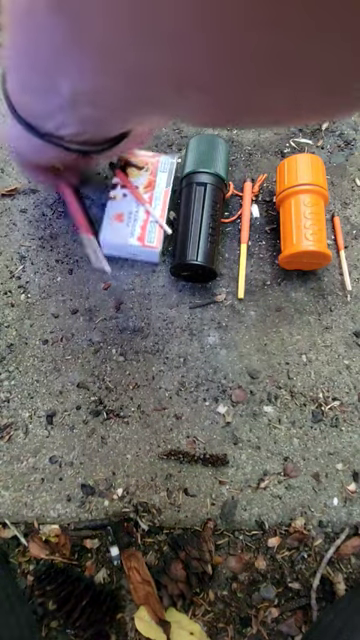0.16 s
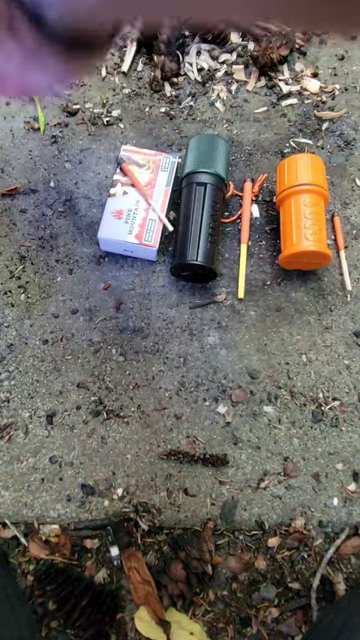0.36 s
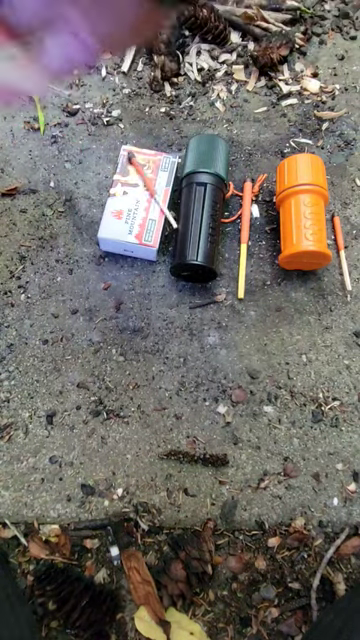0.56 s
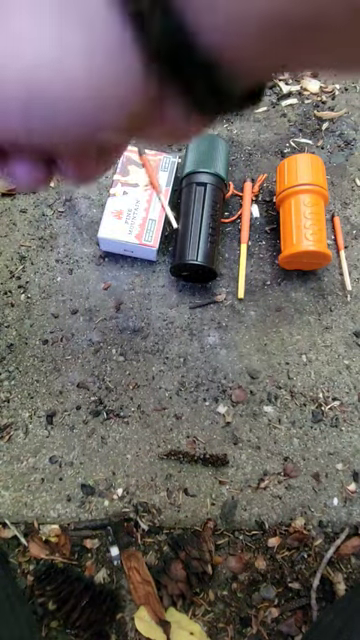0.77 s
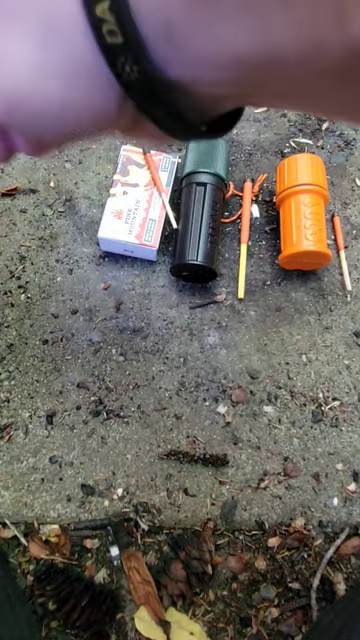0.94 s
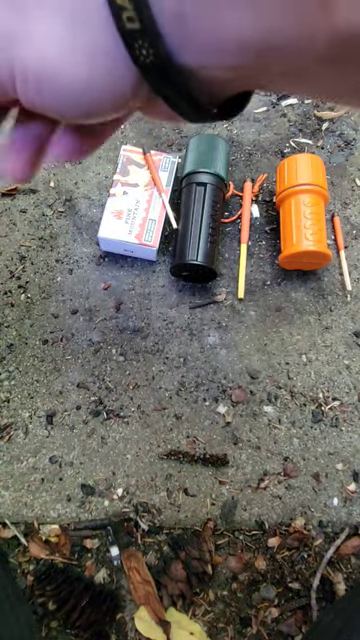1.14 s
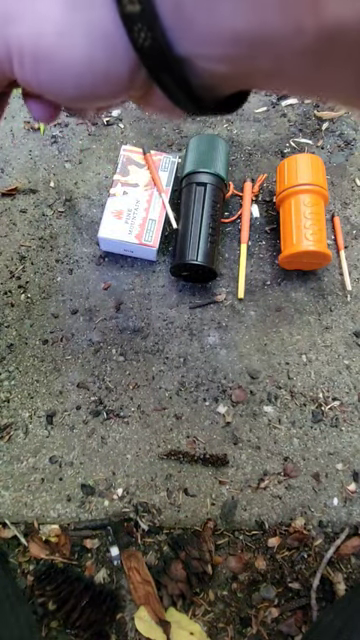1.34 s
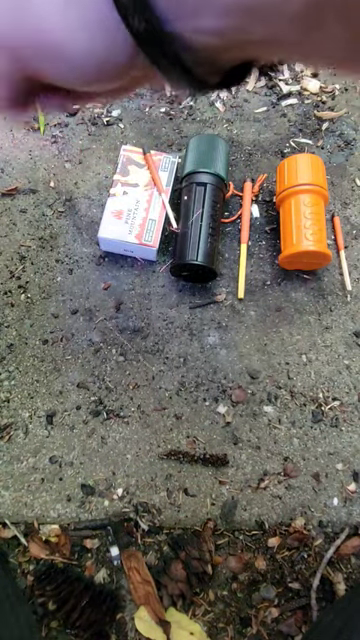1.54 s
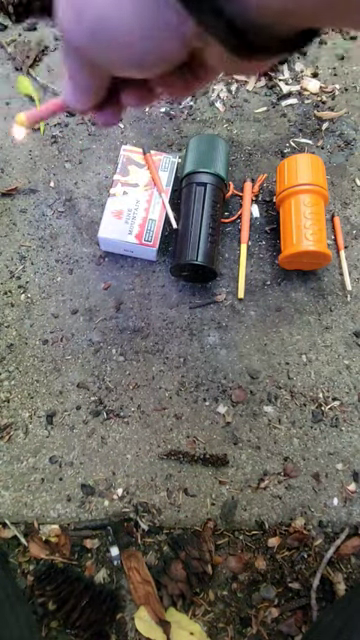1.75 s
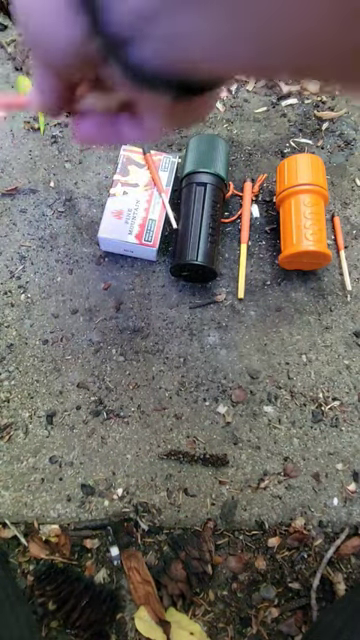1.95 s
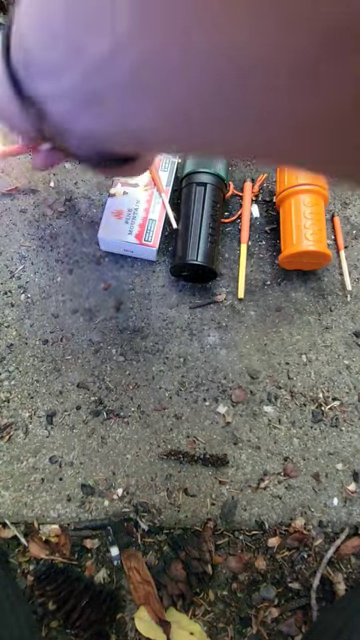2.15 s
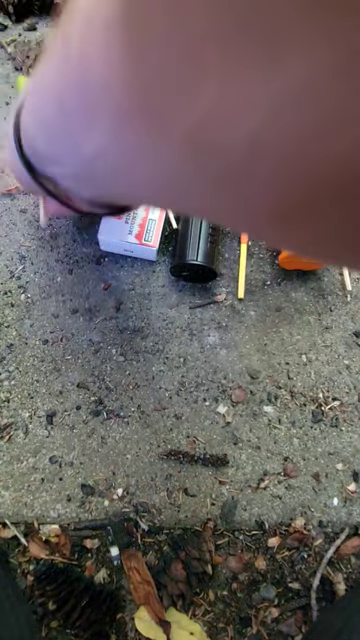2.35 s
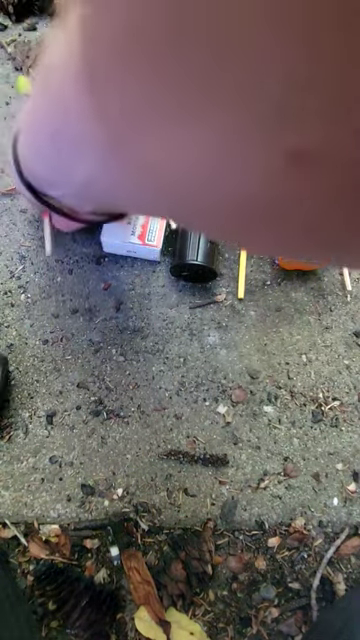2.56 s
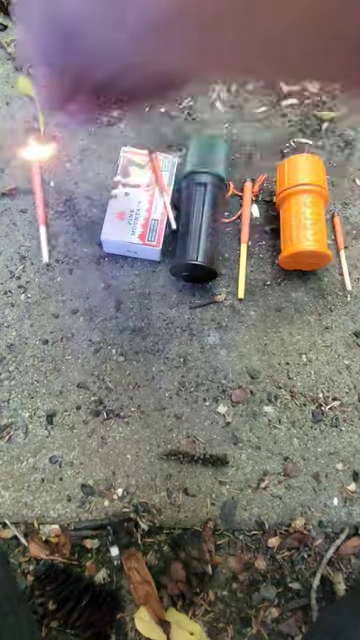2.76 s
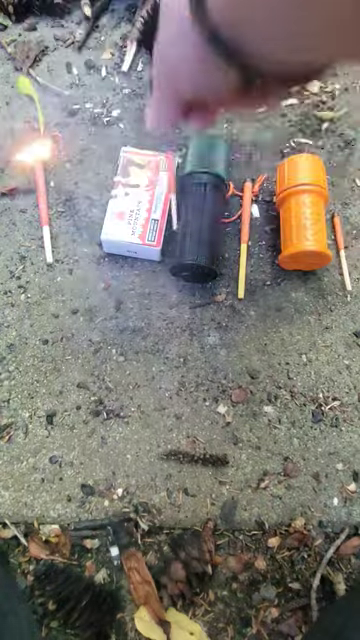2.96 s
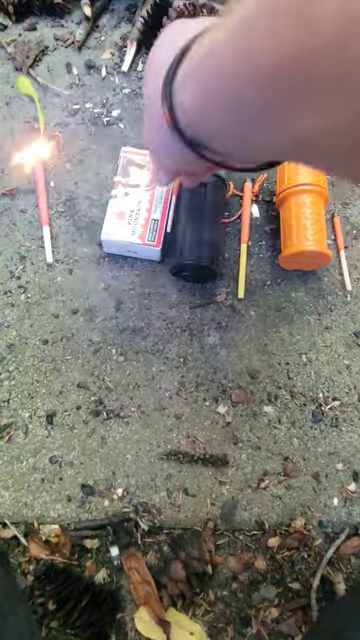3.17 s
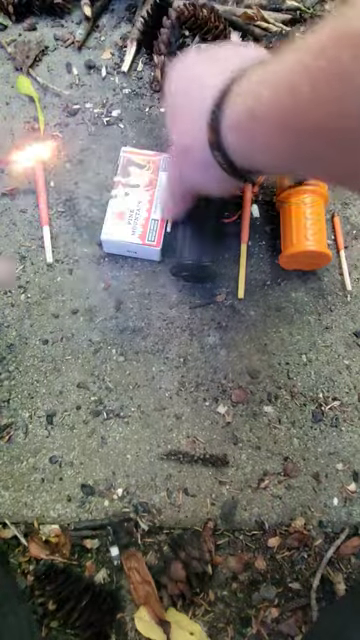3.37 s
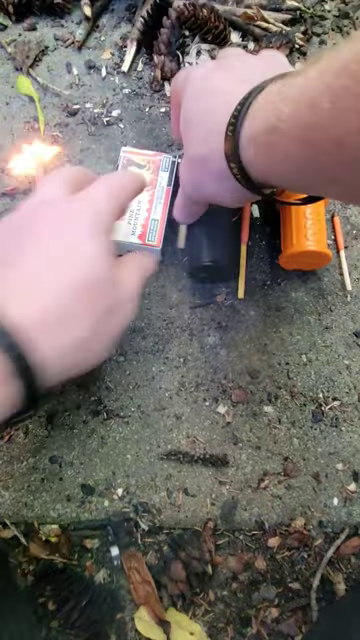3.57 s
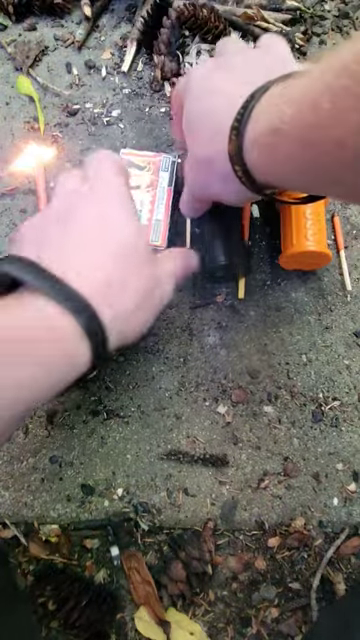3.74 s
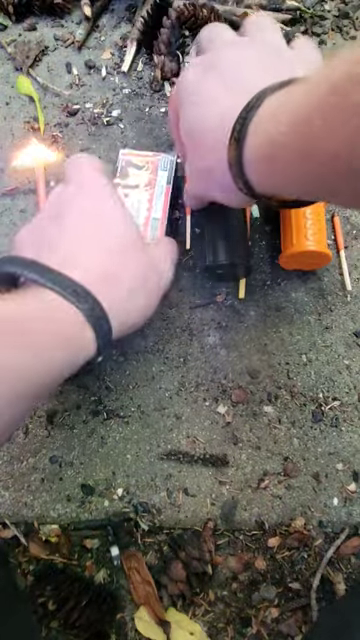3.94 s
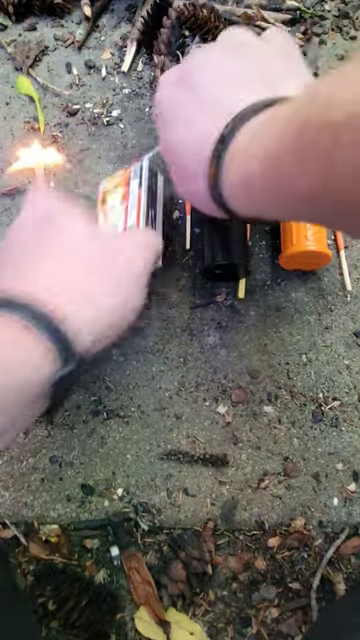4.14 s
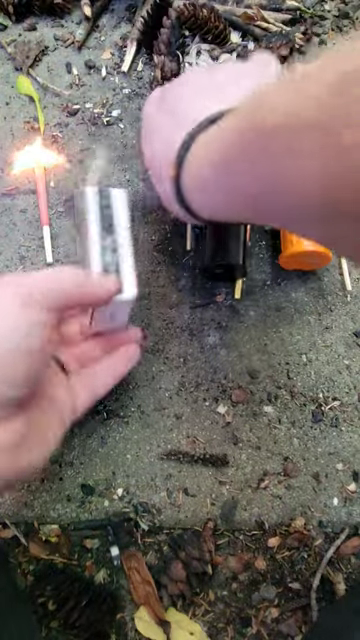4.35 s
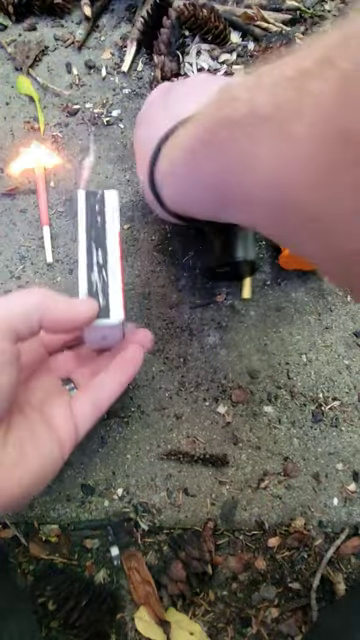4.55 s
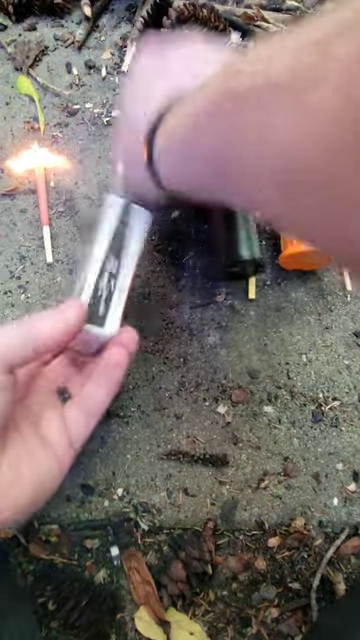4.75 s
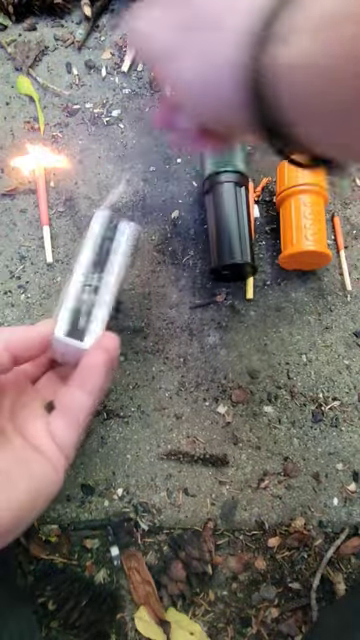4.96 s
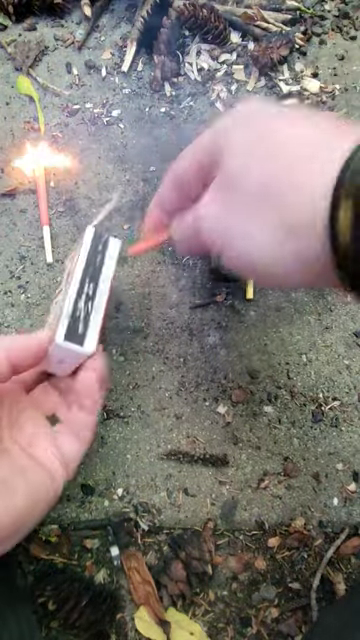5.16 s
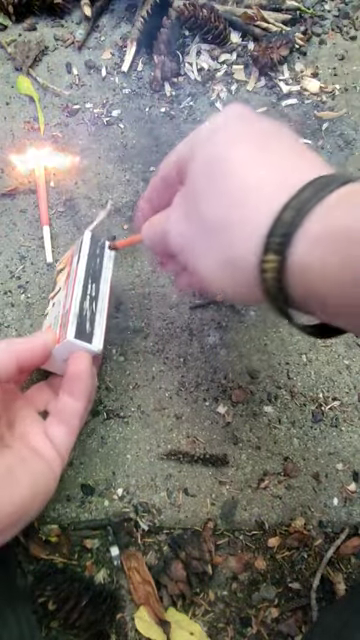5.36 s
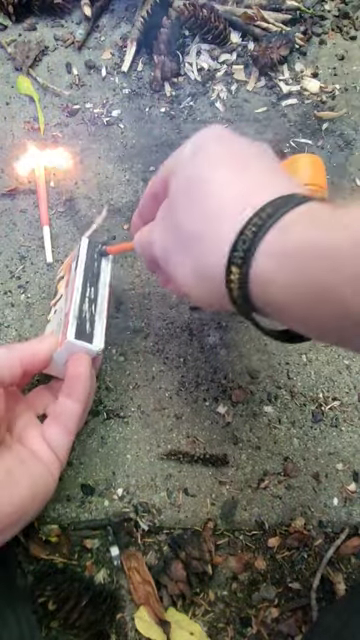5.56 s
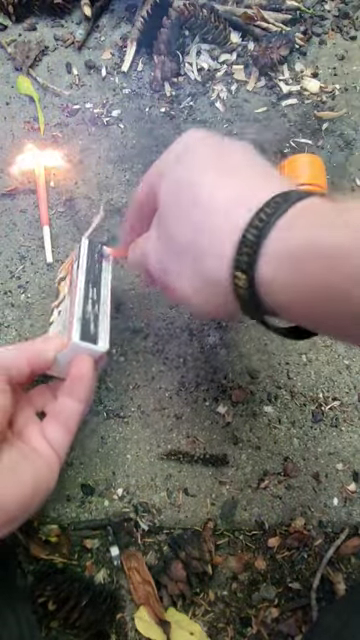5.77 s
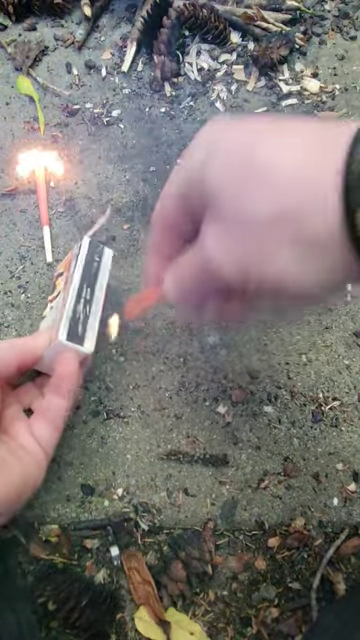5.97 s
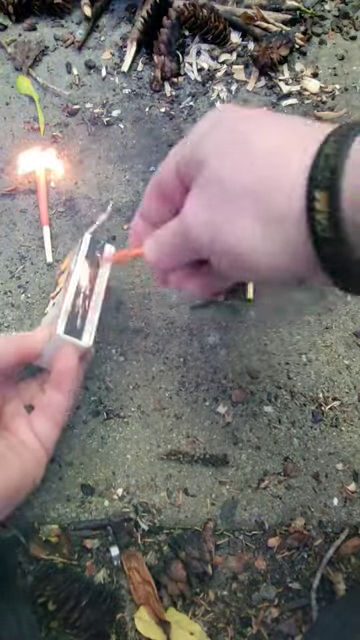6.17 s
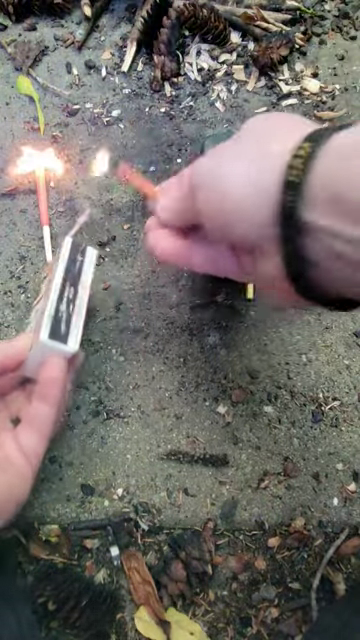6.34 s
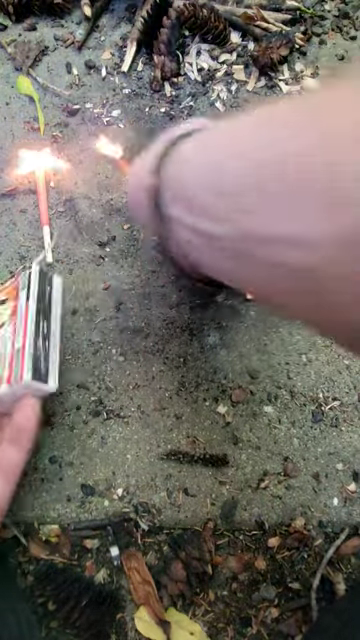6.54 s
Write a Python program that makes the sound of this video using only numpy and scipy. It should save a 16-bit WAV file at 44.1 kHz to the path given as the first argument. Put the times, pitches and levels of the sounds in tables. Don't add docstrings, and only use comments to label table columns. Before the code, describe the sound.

A quiet outdoor place with soft, low distant traffic rumble and a faint airy wash that rises slightly toward the end. From 0 to 1.3 s, small card knocks, stick ticks and short dull rubs are heard close up, with a light sleeve rustle strongest around 0.6 s. At about 1.63 s a match is struck: several gritty bites within a few hundredths of a second, loud and raspy, with a low hand thump. A thin spitting fizz follows, swelling near 1.8 s, then wavering softly as the match is lowered. Crisp stick clicks come at 2.57 s and cluster around 3.1 s, with bright skin rubs near 2.9 s. Card knocks at 4.2 s, three tiny plastic ticks around 4.6 s, and light box taps at 5.3 to 5.6 s. At 5.87 to 5.9 s a second match gives two hard, sharp scrapes. Faint fizz and ambience remain until 6.6 s.

```python
import sys
import numpy as np
from scipy import signal
from scipy.io import wavfile
from scipy.ndimage import uniform_filter1d, map_coordinates

SR = 44100
rng = np.random.default_rng(int(sys.argv[2]) if len(sys.argv) > 2 else 0)


def log_audio(samples):
    frames = np.atleast_2d(samples).T
    limited = np.clip(frames, -1, 1)
    pcm = np.round(limited * 32767).astype(np.int16)
    wavfile.write(sys.argv[1], SR, pcm)


def convert_level_to_amplitude(level_db):
    exponent = np.asarray(level_db, float) / 20
    return 10 ** exponent


N = 291360
PORT_LEAD_S = 0.000283


def evened(x):
    return x / np.sqrt(np.mean(x ** 2) + 1e-20)


def read(points, hz):
    point_hz, value = np.transpose(points)
    return np.interp(np.log(hz + 1), np.log(point_hz + 1), value)


def colour(x, points):
    gain_db = np.maximum(read(points, abs(np.fft.fftfreq(4096, 1 / SR))), -100)
    log_gain = np.log(convert_level_to_amplitude(gain_db))
    taps = np.fft.ifft(np.exp(np.conj(signal.hilbert(log_gain)))).real[:1024]
    taps = taps.reshape((1,) * (x.ndim - 1) + (-1,))
    return signal.oaconvolve(x, taps, axes=-1)[..., :x.shape[-1]]


def ring(x, modes):
    out = 0
    for hz, width_hz, db in modes:
        pole = np.exp((-np.pi * abs(width_hz) + 2j * np.pi * hz) / SR)
        out = out + convert_level_to_amplitude(db) * 2 * signal.lfilter([1 - abs(pole)], [1, -pole], x).real
    return out


def delayed(x, seconds):
    return map_coordinates(x, [np.arange(len(x)) - seconds * SR], order=3)


def at_ports(a, b, lead_s, same):
    same = np.clip(same, 0, 1)
    late = np.roll(a, round(lead_s * SR))
    return np.array([a, same * late + np.sqrt(1 - same ** 2) * b])


def grit(n, share, spread_db):
    size = convert_level_to_amplitude(spread_db * np.minimum(rng.exponential(1, n), 4))
    struck = rng.random(n) < share
    return evened(size * struck) * rng.standard_normal((2, n))


def burst(rise_s, t60_s, before=800, after=8000):
    t = np.arange(-before, after) / SR
    swell = np.exp(-(t / max(rise_s, 1e-4)) ** 2)
    decay = convert_level_to_amplitude(-60 * np.maximum(t, 0) / max(t60_s, .002))
    return np.where(t < 0, swell, decay)


def add(mix, s, sound):
    part = mix[:, max(round(s * SR), 0):][:, :sound.shape[1]]
    part += sound[:, :part.shape[1]]


# time in s, force in dB, rise in s, t60 in s.
CATCHES = [
    (1.6288, -35, 0.01, 0.043),
    (1.6322, -17.5, 0.0026, 0.064),
    (1.6454, -19.5, 0.0026, 0.052),
    (1.6536, -15.5, 0.0052, 0.019),
    (5.8566, -40.5, 0.0025, 0.08),
    (5.8656, -12, 0.0015, 0.011),
    (5.8909, -24, 0.0011, 0.066),
    (5.8964, -15, 0.0016, 0.022),
    (5.9, -34, 0.0012, 0.035),
]
# time in s, force in dB, rise in s, t60 in s.
DRAGS = [
    (1.6362, -14, 0.0007, 0.041),
    (1.661, -37.5, .003, 0.23),
    (5.875, -39, 0.0026, 0.23),
    (5.913, -33.5, 0.0066, 0.012),
]
# time in s, level in dB.
JERKS = [
    (1.6315, -6.5),
    (1.649, -3.5),
    (5.8638, -20),
    (5.8893, -17),
]
# frequency in Hz, level in dB per Hz.
GRIT_TONE = [(180, -17), (300, -1.5), (471, -15.5), (605, -4.5), (1300, -9), (1510, -19), (1730, 11),
             (4480, -8.5), (8590, -2), (13900, 3), (16200, 7.5)]
# frequency in Hz, width in Hz, level in dB.
STRIP = [(620, 90, -3), (820, 120, -2), (1280, 200, -2), (1520, 160, 3), (1950, 280, 2), (2500, 400, -2),
         (3300, 500, -3), (4400, 500, -3), (5800, 600, -6), (7000, 800, -6)]
# frequency in Hz, width in Hz, level in dB.
BOX = [(835, 630, 0), (1087, 990, -5), (2520, 590, -8), (4960, 420, -5.5), (5400, 600, 4)]
# frequency in Hz, width in Hz, level in dB.
THUD = [(62, 29, -2.5), (190, 36, -5.5), (302, 95, -7.5)]
# frequency in Hz, gain in dB.
STROKE_DIP = [(390, 0), (480, -12), (570, 0)]


def strokes():
    out = np.zeros((2, N))
    catch_treble_db, drag_treble_db = 4, -24
    lead_in_s = 800 / SR
    slips = [(*row, catch_treble_db) for row in CATCHES] + [(*row, drag_treble_db) for row in DRAGS]
    for s, force_db, rise_s, t60_s, treble_db in slips:
        push = burst(rise_s, t60_s)
        drag = grit(len(push), .7, 2.2)
        tone = [(hz, db + treble_db * (hz > 3500)) for hz, db in GRIT_TONE]
        rasp = evened(colour(drag, tone)) * push
        body = STRIP if s < 3 else BOX
        modes = [(hz, width_hz, db + treble_db * (hz > 3500)) for hz, width_hz, db in body]
        near = at_ports(*(rasp + convert_level_to_amplitude(5.0) * ring(drag * push, modes)), PORT_LEAD_S, .75)
        add(out, s - lead_in_s, convert_level_to_amplitude(force_db) * near)
    thud = ring(np.gradient(burst(0.00083, 0.0093)), THUD) * convert_level_to_amplitude(36.0)
    ports = np.array([convert_level_to_amplitude(-4) * thud, convert_level_to_amplitude(-0.5) * np.roll(thud, round(0.0014 * SR))])
    for s, jerk_db in JERKS:
        add(out, s - lead_in_s, convert_level_to_amplitude(jerk_db) * ports)
    return colour(out, STROKE_DIP)


# time in s, hiss in dB.
FLAME = [(1.68, -57), (1.8, -51), (1.93, -52.5), (2.06, -52.5), (2.2, -55), (2.32, -58.5), (2.54, -55),
         (2.68, -55.5), (2.91, -61), (3.02, -54), (3.2, -64), (3.36, -61), (3.57, -56.5), (3.81, -61),
         (4.18, -59), (4.77, -57), (5.88, -61), (6.61, -58)]
# time in s, hiss in dB.
SLEEVES = [
    (0.0, -74.5),
    (0.45, -70.5),
    (0.64, -62.5),
    (0.83, -67),
    (1.2, -69.5),
    (1.63, -79),
]
# frequency in Hz, level in dB.
HISS_TONE = [(500, -27), (1200, -20), (2000, -7), (3500, 1), (7500, -3), (8600, -16.5), (11000, -24.5)]
# frequency in Hz, level in dB.
SIZZLE_TONE = [(6500, -40), (8300, -5), (10500, -4), (13000, 0), (15300, 0), (16200, -12)]
# frequency in Hz, width in Hz, level in dB.
NOOKS = [(3000, 160, -4), (5450, 160, 1), (7330, 140, -3)]
# time in s, path in m.
BOUNCE = [
    (1.68, .175),
    (1.95, .18),
    (2.07, .14),
    (2.15, .1),
    (2.27, .05),
    (2.55, .03),
    (6.61, .03),
]
FLAME_SIZZLE, SLEEVE_SIZZLE = (-5, 1.7), (-9, 0.8)


def fizz(rows, law, share, spread_db, flicker_db, ground, hands, same):
    t = np.arange(N) / SR
    s, hiss_db = np.transpose(rows)
    plain_db = -58
    offset_db, slope = law
    sizzle_db = plain_db + offset_db + slope * (hiss_db - plain_db)

    def wander(n):
        return evened(uniform_filter1d(uniform_filter1d(rng.standard_normal(N), n), n))

    flicker, sway = wander(500), wander(9000)
    sparks = grit(N, share, spread_db) * convert_level_to_amplitude(flicker_db * flicker)
    hiss = evened(colour(sparks + ring(sparks, NOOKS), HISS_TONE))
    hiss = hiss * convert_level_to_amplitude(np.interp(t, s, hiss_db, -120, -120))
    sizzle = evened(colour(sparks, SIZZLE_TONE)) * convert_level_to_amplitude(np.interp(t, s, sizzle_db, -120, -120))
    ground_s = np.interp(t, *np.transpose(BOUNCE)) / 343
    hands_s = (.113 + .008 * sway) / 343
    bounce = ground * np.clip(ground_s / 0.0003, .3, 1)
    echoed = [row + bounce * delayed(row, ground_s) + hands * delayed(row, hands_s) for row in hiss]
    hiss_pair = at_ports(*echoed, PORT_LEAD_S, same)
    sizzle_pair = at_ports(*sizzle, PORT_LEAD_S, same / 2) * convert_level_to_amplitude([[1.5], [-1.5]])
    return hiss_pair + sizzle_pair


def patchy(x, depth_db):
    z = signal.stft(x, nperseg=256)[2]
    patches = rng.standard_normal(z.shape[:0:-1]).T
    patches = uniform_filter1d(uniform_filter1d(patches, 4, 0), 30, 1)
    return signal.istft(z * convert_level_to_amplitude(depth_db * evened(patches)), nperseg=256)[1][:, :N]


# time in s, blow in dB, ring in Hz.
CARD = [(0.1031, -30.5, 1120), (0.2694, -37, 1210), (.44, -44, 527), (4.88, -43.5, 1090),
        (5.368, -44, 1780), (3.509, -41, 1270), (4.1859, -34, 1230), (4.192, -32, 1015),
        (5.2594, -42.5, 1070), (5.5146, -37, 1060), (5.6262, -30.5, 1037), (6.24, -38, 1240)]
# time in s, blow in dB, ring in Hz, crack in dB.
STICKS = [(0.2371, -33.5, 2590, -16), (0.2523, -30, 1890, 0), (0.5657, -38, 2520, 8.5),
          (0.5768, -41.5, 2280, 5.5), (0.84, -27.5, 1495, -11), (1.1942, -38.5, 1400, -6.5),
          (1.752, -39, 2780, -17), (2.5708, -25, 2520, -3.5), (2.5844, -36.5, 2880, 3),
          (2.89, -42, 3000, -5), (2.9583, -39.5, 3020, 3), (2.995, -44, 2010, -17),
          (3.1146, -26, 2420, -14), (3.1253, -24.5, 2540, 5.5), (3.1527, -36.5, 3030, 10.5),
          (3.1626, -34.5, 2440, -4), (3.5233, -46, 2410, -14), (3.6163, -40.5, 1340, 4.5),
          (3.685, -50, 2770, 3), (0.8555, -46, 1880, 2), (2.876, -45, 3900, -10)]
# time in s, blow in dB, ring in Hz.
SNAPS = [
    (0.0424, -55, 4040),
    (2.6813, -37.5, 7800),
    (2.74, -47.5, 7760),
    (3.0446, -44, 5970),
    (3.0535, -40, 5500),
    (4.047, -56, 4000),
    (6.0162, -46, 3000),
]
# time in s, blow in dB, ring in Hz.
HITS = [
    (1.6312, -16.5, 1450),
    (3.0977, -25.5, 2500),
    (5.5354, -40, 1160),
    (5.6275, -38, 2330),
    (5.8958, -13, 930),
]
# time in s, blow in dB, ring in Hz.
PLASTIC = [
    (4.557, -42, 4350),
    (4.6124, -39.5, 4630),
    (4.6674, -41, 4600),
    (5.032, -42, 3950),
]
CARD_KIND, STICK_KIND = (-20, -15, 0.02), (-33, 0.04)
SNAP_KIND, HIT_KIND, PLASTIC_KIND = (1.3, 8, .03), (-1, -2, 0.021), (-18, -22, .04)


def ticks():
    out = np.zeros((2, N))
    kinds = ((CARD, CARD_KIND), (STICKS, STICK_KIND), (SNAPS, SNAP_KIND), (HITS, HIT_KIND),
             (PLASTIC, PLASTIC_KIND))
    rows = [(*row, *kind) for table, kind in kinds for row in table]
    for s, blow_db, hz, crack_db, air_db, t60_s in rows:
        push = burst(.0009, .006 + t60_s / 5, before=100, after=3000)
        contact = grit(len(push), .7, 2.2) * push
        contact[:, 100] = 2.6
        width_hz = 3.2 / t60_s
        modes = [(hz, width_hz, 9), (hz * .8, .15 * hz, -6), (hz * 1.2, 2 * width_hz, -4),
                 (hz * 1.5, .3 * hz, -12)]
        body = ring(ring(contact, modes), [(hz * 1.2, 1.1 * hz, 0)])
        crack_modes = [(5150, 4 * width_hz, 8), (5700, 500, 0), (6500, 700, -3), (7400, 600, -3)]
        crack = ring(ring(contact, crack_modes), [(6200, 3500, 0)])
        air = colour(contact, SIZZLE_TONE)
        parts = (0, body), (crack_db, crack), (air_db, air)
        tick = sum(convert_level_to_amplitude(db) * part / abs(part).max() for db, part in parts)
        side = -1.5 if .7 < s < 1.3 else 1
        side *= .15 if hz > 1900 else 1
        pair = at_ports(*tick, side * PORT_LEAD_S, .65) * convert_level_to_amplitude([[side / 2], [-side / 2]])
        add(out, s - 60 / SR, convert_level_to_amplitude(blow_db + 2) * pair)
    return out


# start in s, length in s, level in dB, centre in Hz.
CARD_RUBS = [(0.095, 0.025, -48, 860), (0.156, 0.13, -59, 5500), (0.253, 0.035, -47, 1190),
             (0.255, 0.045, -52, 5460), (0.672, 0.045, -57.5, 7000), (1.004, 0.017, -47, 4370),
             (5.255, .03, -56, 1700), (3.47, 0.11, -57.5, 2280), (4.15, 0.042, -54.5, 1160),
             (4.725, 0.024, -57, 2500), (5.009, 0.051, -49.5, 2360), (5.024, 0.033, -52.5, 5960)]
# start in s, length in s, level in dB, centre in Hz.
SKIN_RUBS = [
    (0.077, 0.034, -56.5, 3950),
    (0.398, 0.028, -62, 9000),
    (0.959, .006, -52.5, 4000),
    (2.867, 0.08, -54.5, 3520),
    (2.937, 0.047, -52, 3000),
    (3.002, 0.11, -62, 5000),
    (3.034, 0.036, -52, 9000),
    (4.555, 0.13, -59.5, 6000),
    (4.846, 0.047, -52.5, 6370),
]


def rubs():
    out = np.zeros((2, N))
    card_treble_db, skin_treble_db = -13.5, 0.5
    rows = [(*row, card_treble_db) for row in CARD_RUBS] + [(*row, skin_treble_db) for row in SKIN_RUBS]
    for s, length_s, level_db, hz, treble_db in rows:
        drag = grit(round(length_s * SR), .15, 3.2)
        rub = evened(ring(ring(drag, [(hz, .7 * hz, 0)]), [(hz, 1.6 * hz, 0)]))
        rub += convert_level_to_amplitude(treble_db) * evened(colour(drag, SIZZLE_TONE))
        fade = signal.windows.tukey(drag.shape[1], .6)
        add(out, s, convert_level_to_amplitude(level_db) * at_ports(*rub, PORT_LEAD_S, 0.21) * fade)
    return out


def surroundings(x):
    t60_s = 0.076
    at = np.arange(40, 6000, 20) + rng.integers(0, 20, (2, 298))
    taps = np.zeros((2, 6100))
    echoes = rng.choice([-1., 1.], at.shape) * convert_level_to_amplitude(-60 * at / SR / t60_s)
    np.put_along_axis(taps, at, echoes, 1)
    tail = signal.oaconvolve(x, taps / np.linalg.norm(taps[0]), axes=1)[:, :N]
    return colour(tail, [(400, -3.5), (1000, -2), (4000, 1.5), (9000, -13.0), (16000, 5)])


# frequency in Hz, level in dB per Hz.
YARD_TONE = [(15, -87), (25, -17.5), (59, 4), (141, -17), (212, -13.5), (236, -22), (317, -17),
             (476, -27.5), (575, -22.5), (714, -19.5), (818, -21), (1160, -25.5), (1260, -28.5),
             (2610, -34), (16000, -51.5)]
# frequency in Hz, side minus mid in dB.
YARD_SIDE = [(60, -12.5), (120, -55), (240, -3.5), (480, 2), (950, 2), (1890, 6), (3770, 1), (7520, -1),
             (15000, -8)]
# frequency in Hz, left minus right in dB.
YARD_LEAN = [(60, 0), (180, -6), (550, 1), (1650, 0), (4970, -2.5), (15000, 1)]
# time in s, rumble about its mean in dB.
TRAFFIC = [
    (0.0, 1.5),
    (1.25, 2),
    (2.1, -0.5),
    (3.4, -1),
    (4.9, 1),
    (5.25, 2.5),
    (5.7, 2),
    (6.35, 2.5),
    (6.61, 0),
]


def yard():
    frames, hz = N // 256 + 5, np.fft.rfftfreq(1024, 1 / SR)[:, None]
    a, b, c, d, patches = rng.standard_normal((frames, 513, 5)).T
    patches = evened(uniform_filter1d(uniform_filter1d(patches, 8, 0), 14, 1))
    t = np.arange(frames) * 256 / SR
    low = 1 / (1 + (hz / 330) ** 4)
    rumble_db = np.interp(t, *np.transpose(TRAFFIC))
    wash_db = 0.16 * rumble_db + 0.67 * (t - t.mean())
    drift_db = low * rumble_db + (1 - low) * wash_db
    air_db = 5 * (hz / 10000) ** 2
    mid = a + 1j * b
    side = (c + 1j * d) * convert_level_to_amplitude(read(YARD_SIDE, hz))
    lean = convert_level_to_amplitude(read(YARD_LEAN, hz) / 2)
    level = convert_level_to_amplitude(read(YARD_TONE, hz) + drift_db + 1.75 * patches - air_db)
    z = np.array([(mid + side) * lean, (mid - side) / lean]) * level
    return convert_level_to_amplitude(-47.5) * evened(signal.istft(z, nperseg=1024, noverlap=768)[1][:, :N])


def scene():
    near = strokes() + ticks() + rubs()
    flame = fizz(FLAME, FLAME_SIZZLE, share=.4, spread_db=3.0, flicker_db=2.0, ground=.48, hands=.33, same=.45)
    sleeves = fizz(SLEEVES, SLEEVE_SIZZLE, share=0.33, spread_db=2.5, flicker_db=1.0,
                   ground=0.16, hands=0.18, same=0.83)
    hisses = patchy(convert_level_to_amplitude(.3) * flame + convert_level_to_amplitude(1.5) * sleeves, 1.7)
    return near + convert_level_to_amplitude(-7) * surroundings(near) + hisses + yard()


def band_limit(x):
    return signal.sosfilt(signal.butter(12, 16640, fs=SR, output="sos"), x)


# frequency in Hz, gain in dB.
MICROPHONE = [(7400, 0.5), (8800, 1), (10500, 1), (13500, 0.5), (15500, -3), (15900, -32), (17000, -40)]


def record(dry):
    self_noise = convert_level_to_amplitude(-74) * rng.standard_normal((N, 2)).T
    low_cut = signal.butter(2, 35, "high", fs=SR, output="sos")
    cut = signal.sosfilt(low_cut, dry + self_noise)
    soft = .95 * np.tanh(cut / .95)
    return band_limit(colour(soft, MICROPHONE))


dry = scene()
out = record(dry)
log_audio(out)
```